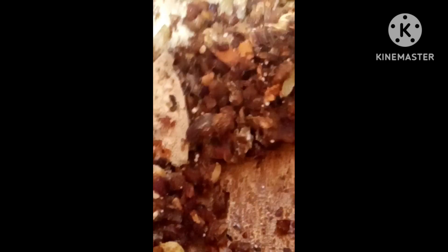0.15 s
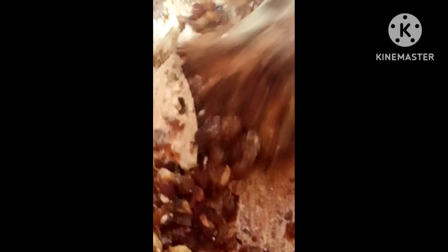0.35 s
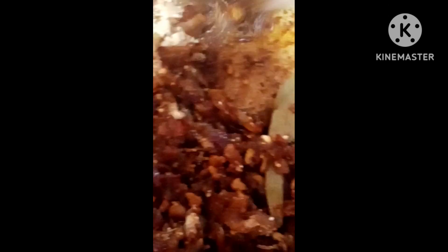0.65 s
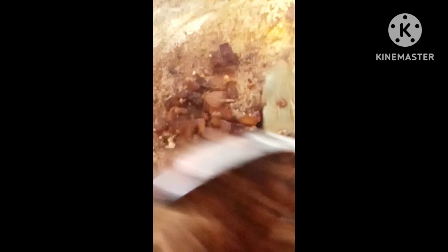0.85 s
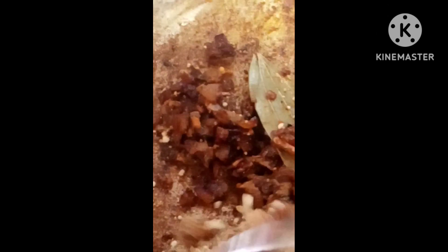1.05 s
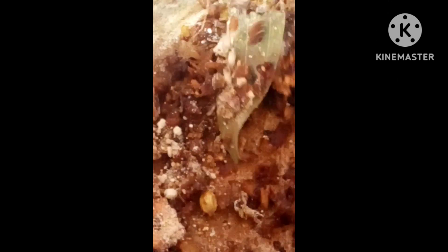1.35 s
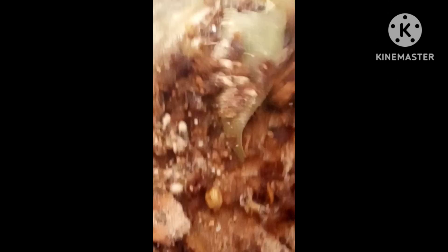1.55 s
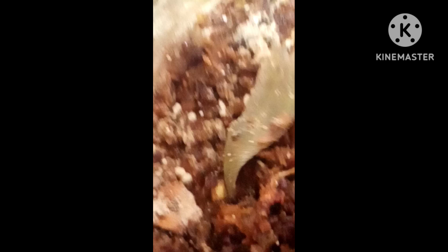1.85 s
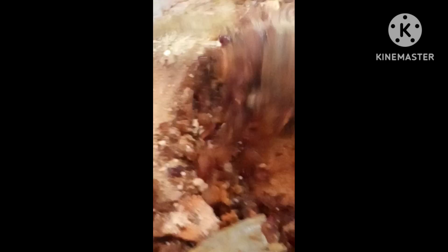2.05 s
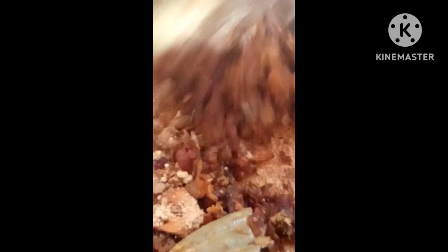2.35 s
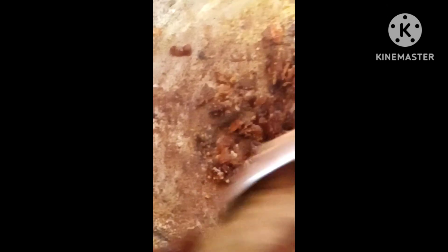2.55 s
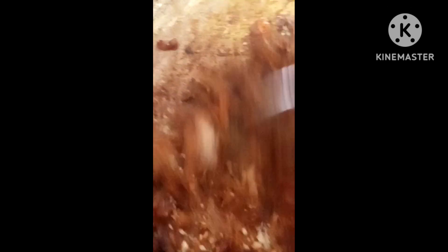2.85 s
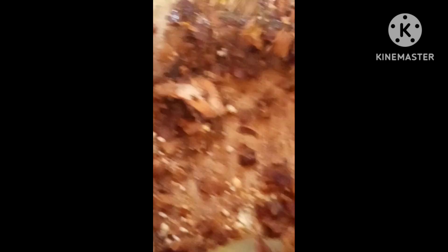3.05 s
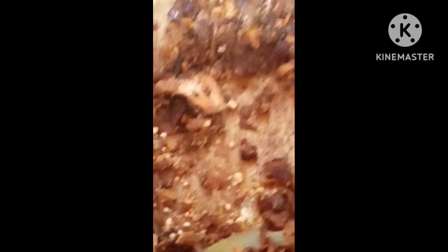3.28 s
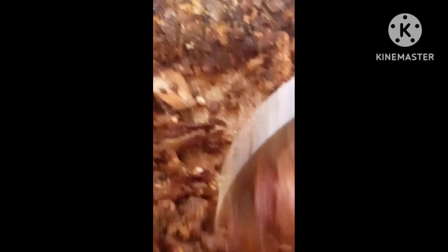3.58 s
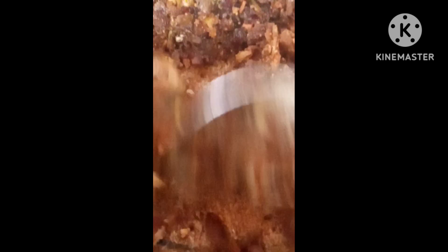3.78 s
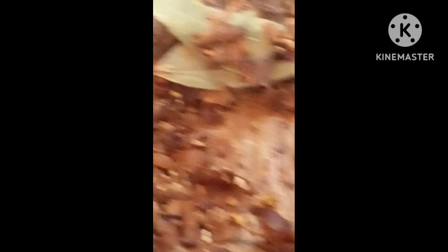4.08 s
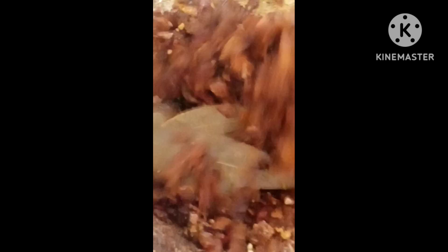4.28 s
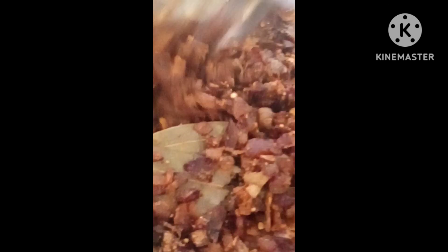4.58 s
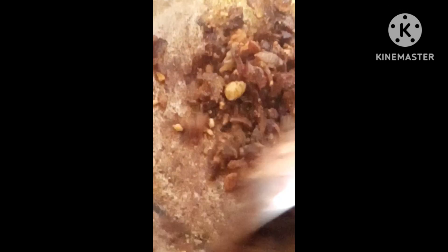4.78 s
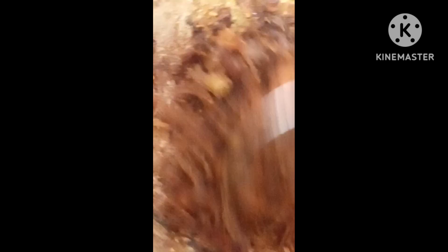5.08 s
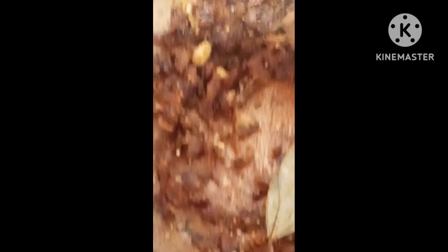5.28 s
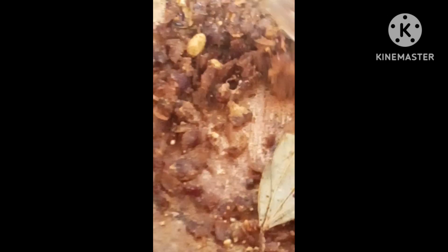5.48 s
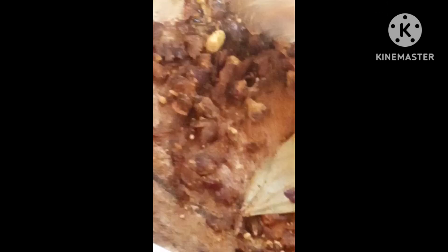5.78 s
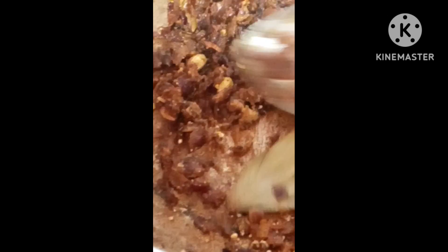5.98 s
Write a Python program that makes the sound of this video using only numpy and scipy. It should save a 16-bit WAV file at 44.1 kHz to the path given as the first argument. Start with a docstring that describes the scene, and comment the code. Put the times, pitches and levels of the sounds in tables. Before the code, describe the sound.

A metal spoon scrapes and clinks against a pan, shoving dry, crumbly fried spices around in short uneven strokes, close up in a small kitchen.

```python
"""Small kitchen: a steel spoon stirs dry fried spices in a metal pan, close to two unlike microphones.
Grinding and knocks: grain noise and single clicks excite the pan's damped modes; hiss and cracks are added.
Crumbs and drone: the shoved heap sets the level of clumped, filtered grains and of low resonant noise.
Hum: steady coloured noise with two low tones. Room: feedback delays answer the knocks."""
import sys
import numpy as np
from scipy import signal
from scipy.fft import rfft, irfft, next_fast_len
from scipy.io import wavfile

SR = 44100
rng = np.random.default_rng(int(sys.argv[2]) if len(sys.argv) > 2 else 0)


def to_wav(s):
    """Save 16-bit WAV."""
    ch = np.atleast_2d(s).T  # columns
    pcm = np.round(np.clip(ch, -1, 1) * 32767)  # PCM
    wavfile.write(sys.argv[1], SR, pcm.astype(np.int16))


N = 270494

# All table levels are relative: layer offsets, OUTPUT_GAIN_DB and the microphone filters follow.
# Spoon grinding strokes: crest_s, level_db, rise_s, fall_s, best_mode_hz
SCRAPE_STROKES = [(0.0, -47.5, 0.1, 0.3, 6735), (0.326, -46.5, 0.035, 0.18, 5800),
                  (0.529, -42.5, 0.16, 0.067, 4600), (0.635, -41, 0.023, 0.29, 6735),
                  (0.699, -41.5, 0.11, 0.32, 5800), (1.05, -56, 0.012, 0.3, 6735),
                  (1.248, -51, 0.28, 0.24, 2840), (1.535, -49.5, 0.056, 0.23, 6735),
                  (1.62, -46.5, 0.05, 0.074, 2980), (1.888, -53, 0.011, 0.4, 5800),
                  (2.06, -53.5, 0.23, 0.043, 3050), (2.37, -32.5, 0.1, 0.18, 3380),
                  (2.77, -45.5, 0.045, 0.35, 3050), (3.165, -50, 0.023, 0.15, 2650),
                  (3.354, -39.5, 0.19, 0.16, 2900), (3.74, -49, 0.064, 0.59, 7200),
                  (4.202, -32.5, 0.035, 0.084, 3400), (4.608, -30.5, 0.11, 0.11, 5335),
                  (4.74, -47, 0.15, 0.16, 6735), (5.02, -36.5, 0.0066, 0.15, 4670),
                  (5.2, -50.5, 0.23, 0.15, 2840), (5.428, -59.5, 0.044, 0.13, 2650),
                  (5.607, -50.5, 0.12, 0.11, 6735), (5.882, -56, 0.019, 0.038, 6735),
                  (6.0, -56, 0.12, 0.1, 3050)]
# Spoon shoving the heap: crest_s, rolling_db, rattling_db, drone_db, gather_s, settle_s
HEAP_SHOVES = [(0.0, -61, -53, -47, 0.1, 0.28), (0.18, -44.5, -47.5, -44, 0.22, 0.14),
               (0.35, -49, -54, -45, 0.2, 0.21), (0.688, -39.5, -50, -51, 0.1, 0.23),
               (1.299, -45, -44.5, -45, 0.18, 0.37), (2.085, -51.5, -48.5, -47, 0.2, 0.2),
               (2.305, -43, -49, -44.5, 0.21, 0.23), (2.975, -45, -45, -44.5, 0.15, 0.27),
               (3.2, -48, -59, -48, 0.17, 0.21), (3.39, -49, -61, -73, 0.15, 0.099),
               (3.732, -74, -72, -54, 0.049, 0.14), (3.93, -47.5, -41, -49, 0.029, 0.21),
               (4.007, -43.5, -44, -40, 0.043, 0.15), (4.215, -42.5, -40.5, -48.5, 0.15, 0.11),
               (4.536, -42, -54, -66, 0.076, 0.26), (4.67, -41.5, -50.5, -65, 0.1, 0.14),
               (5.05, -62, -40.5, -51, 0.049, 0.31), (5.24, -45.5, -43.5, -43.5, 0.086, 0.26)]
# Spoon blows on the pan: start_s, peak_db, best_mode_hz, thud_db (re peak), clink_db (re peak)
SPOON_KNOCKS = [(0.085, -17, 2820, -19, -21), (0.1418, -16, 2599, -22, -17), (0.173, -28.5, 2720, -10, -21),
                (0.2112, -28, 2580, -20, -21), (0.268, -27, 2790, -6, -25), (0.35, -25.5, 2476, -5.5, -16),
                (0.4099, -25, 2720, -14.5, -41), (1.153, -30, 2496, -11.5, -15),
                (1.2352, -18, 2840, -19, -21), (1.2922, -24, 2610, -16, -21), (1.321, -29, 2140, -16, -22),
                (1.3454, -17.5, 2850, -15, -20.5), (1.496, -32, 2840, -7, -31),
                (1.976, -35.5, 2415, -5, -18), (2.0516, -17, 2816, -14.5, -25),
                (2.1038, -21.5, 2387, -9.5, -20.5), (2.1999, -22, 2840, -11, -22.5),
                (2.2395, -26.5, 2730, -9, -13.5), (2.2845, -20.5, 2860, -25, -29),
                (2.9144, -17.5, 2840, -19, -19), (2.974, -19, 2607, -13, -12),
                (3.046, -24, 2680, -11.5, -14), (3.108, -30, 2830, -11, -32),
                (3.1569, -18.5, 2515, 3, -12.5), (3.2196, -22, 2590, -24, -18),
                (3.6963, -27, 885, 4, -10.5), (3.914, -15.5, 2853, -24, -19.5),
                (3.9854, -18.5, 2634, -17, -13), (4.119, -20.5, 1890, -2.5, -15.5),
                (4.1826, -17.5, 3420, -20, -21), (5.0105, -14.5, 4430, -7.5, -2.5),
                (5.1847, -16.5, 2820, -15.5, -21.5), (5.2437, -20.5, 2570, -13.5, -17),
                (5.3214, -31, 2370, -21, -15), (5.371, -33.5, 2720, -8, -27), (5.418, -25, 2510, -10, -15)]
# Pan and spoon mode pitches: mode_hz
MODE_HZ = [540, 760, 1000, 1200, 1920, 2160, 2455, 2650, 2840, 3050, 3380, 3760, 4245, 4670, 5335, 5800,
           6735, 7150, 8400]
# Food-damped modes, one row per MODE_HZ: knocked_db, ground_db, t60_s (when ground)
PAN_MODES = [(-7, -19.5, 0.028), (-10.5, -13.5, 0.016), (-1, -20, 0.04), (4.5, -26, 0.014),
             (-11.5, -42, 0.07), (-13, -29, 0.072), (2.5, -32, 0.025), (-0.5, -14, 0.042),
             (1.5, -12.5, 0.031), (-11, -8, 0.056), (-3.5, -1.5, 0.037), (-11, -11, 0.044),
             (2.5, 0.5, 0.02), (9.5, -3.5, 0.025), (-1.5, -2, 0.043), (0.5, -10.5, 0.044), (-5, -8, 0.071),
             (1.5, -30, 0.034), (-5, -11.5, 0.037)]
# Pan bottom resonances: centre_hz, width_hz, level_db
BOTTOM_MODES = [(207.8, 7.7, -4), (242.7, 20.5, -0.5), (314.2, 18, -1), (418, 35, -5.5)]
# Grit hiss spectrum: freq_hz, density_db (per Hz)
GRIT_SPECTRUM = [(1060, -55), (1800, -33), (2790, -8), (3350, -3.5), (3840, -14), (4660, -7.5), (6710, -2),
                 (11000, -21.5), (15000, -11), (16000, -4)]
# Tumbling crumb spectrum: freq_hz, density_db (per Hz)
CRUMB_SPECTRUM = [(250, -8), (400, -8.5), (900, -8), (1500, -9), (2700, -4), (4000, -15), (8000, -76)]
# Kitchen hum spectrum: freq_hz, density_db (per Hz)
HUM_SPECTRUM = [(24, -38), (40, -45), (115, 3.5), (615, -16), (896, -11.5), (1590, -13), (2980, -14),
                (3930, -14), (6650, -30), (11000, -86), (14800, -49), (16000, -15.5)]
# Narrow hum tones: centre_hz, width_hz, level_db
HUM_TONE_BANDS = [(97, 16.4, -63), (141.4, 4.7, -63)]
# Left microphone response re right: freq_hz, gain_db
LEFT_RESPONSE = [(100, -2.5), (400, -6.5), (750, 0.5), (1500, -6), (2800, -6), (9000, -1.5), (11000, -2.5),
                 (14000, -23.5)]

SWING_DB = 20  # gesture rises this much over its rise time, drops it over its fall time
SCRAPE_ROUND, SHOVE_ROUND = 1.48, 1.165  # exponent: 1 = pointed crest, 2 = bell
EDGE_REST_DB, HEAP_REST_DB = -70, -68  # between gestures
FAVOUR_DB, FAVOUR_WIDTH_LOG_HZ = 5, 0.073  # lift of modes near the best shaken one
GROUND_SPLIT_HZ = 2300  # heap shakes modes up to here, spoon edge those above
CRISP_FROM_HZ = 1720  # crumbs roll below, rattle above
HUM_DB = -62
PRESSED_T60_SHARE, DRIVE_T60_SHARE = 0.75, 0.27
KITCHEN_BASS_T60_S, WALL_CUT_HZ, KITCHEN_DB = 0.31, 8100, -21
LEFT_LEAD_SAMPLES, OUTPUT_GAIN_DB, CUTOFF_HZ = 46, 6.0, 16800


def from_db(db):
    """Decibels to gain."""
    return 10 ** (np.asarray(db) / 20)


def rms_one(x):
    """Scale to rms 1."""
    return x / np.sqrt(np.mean(x ** 2) + 1e-20)


def colour(x, points):
    """Filter with a (Hz, dB) curve, interpolated over log frequency."""
    size = next_fast_len(N)
    freq_hz = np.maximum(np.arange(size // 2 + 1) * SR / size, 1)
    point_hz, point_db = np.transpose(points)
    gain = from_db(np.interp(np.log(freq_hz), np.log(point_hz), point_db))
    return irfft(rfft(x, size) * gain, size)[..., :N]


def drift(rate_hz):
    """Slow random wander, rms 1: two-pole lowpassed noise at SR / 40."""
    r = np.exp(-80 * np.pi * rate_hz / SR)
    noise = rng.standard_normal(N // 40 + 2002)
    slow = signal.lfilter([1], [1, -2 * r, r * r], noise)[2000:]  # drop the run-in
    return np.interp(np.arange(N) / 40, np.arange(len(slow)), rms_one(slow))


def ring(clicks, hz, t60_s):
    """Two-pole resonator: a unit click starts a decaying sine of height 1."""
    r = np.exp(-np.log(1000) / (t60_s * SR))
    w = 2 * np.pi * hz / SR
    return signal.lfilter([0, np.sin(w)], [1, -2 * r * np.cos(w), r * r], clicks + 1e-18)


def hiss_in(hz, width_hz):
    """Noise through one resonance, rms 1."""
    t60_s = np.log(1000) / (np.pi * width_hz)
    return rms_one(ring(rng.standard_normal(N), hz, t60_s))


def grains(per_s, spread_db):
    """Random clicks of uneven size, rms 1."""
    size_db = spread_db * np.minimum(rng.exponential(1, N), 5)
    sizes = from_db(size_db) * rng.choice([-1, 1], N)
    return rms_one(sizes * (rng.random(N) < per_s / SR))


def two_ears(shared, own, alike):
    """Mix by power share: a part common to both microphones and one of each's own."""
    alike = np.clip(alike, 0, 1)
    return np.sqrt(alike) * shared + np.sqrt(1 - alike) * np.asarray(own)


def gestures(crest_s, peak_db, rise_s, fall_s, roundness, rest_db):
    """Level in dB of overlapping gestures: each swells and dies away; their powers add."""
    from_crest_s = np.arange(0, N + 64, 64) / SR - crest_s[:, None]
    away = np.where(from_crest_s < 0, -from_crest_s / rise_s[:, None], from_crest_s / fall_s[:, None])
    each_db = peak_db[:, None] - SWING_DB * away ** roundness
    power = from_db(2 * each_db).sum(axis=0) + from_db(2 * rest_db)
    return np.interp(np.arange(N) / 64, np.arange(len(power)), 10 * np.log10(power))


def scraping(hz=None):
    """Stroke strength in dB, overall or as the mode at hz feels it."""
    crest_s, level_db, rise_s, fall_s, best_hz = np.transpose(SCRAPE_STROKES)
    if hz:
        level_db = level_db + FAVOUR_DB * np.exp(-(np.log(hz / best_hz) / FAVOUR_WIDTH_LOG_HZ) ** 2)
    return gestures(crest_s, level_db, rise_s, fall_s, SCRAPE_ROUND, EDGE_REST_DB)


def grinding(rolling_db):
    """Grit under the spoon's edge shakes the high modes, the rolling heap the low ones, in fits."""
    fits_db = 2.0 * drift(23.6) + 40
    grit = two_ears(grains(1800, spread_db=2.5), rng.standard_normal((2, N)), 0.58)
    modes = 0
    for hz, (_, ground_db, t60_s) in zip(MODE_HZ, PAN_MODES):
        if hz > GROUND_SPLIT_HZ:
            push_db = 1.173 * (scraping(hz) + fits_db) - 36.5  # hard strokes reach the metal
        else:
            push_db = rolling_db + 11.0
        mode_db = ground_db + 5.2 * drift(17)
        modes = modes + ring(grit * from_db(push_db + mode_db), hz, t60_s) / np.sqrt(t60_s * SR)
    hiss = rms_one(colour([grains(3000, spread_db=3.0), grains(3000, spread_db=0.5)], GRIT_SPECTRUM))
    hiss_db = 0.91 * (scraping() + fits_db) - 42.5  # light strokes mostly hiss
    return modes + from_db(hiss_db) * hiss


def crumbs(rolling_db, rattling_db):
    """Crumbs tumble in clumps: dull rolling below the split, crisp rattling above."""
    tumble = two_ears(grains(1500, spread_db=5.5), rng.standard_normal((2, N)), 0.28)
    clumps_db = 2.2 * drift(25)
    tumble = from_db(clumps_db - 3.0) * rms_one(colour(tumble, CRUMB_SPECTRUM))
    dull = signal.sosfilt(signal.butter(4, CRISP_FROM_HZ, "low", fs=SR, output="sos"), tumble)
    crisp = signal.sosfilt(signal.butter(4, CRISP_FROM_HZ, "high", fs=SR, output="sos"), tumble)
    return from_db(rolling_db) * dull + from_db(rattling_db) * crisp


def bottom(drone_db):
    """The pushed load keeps the pan's lowest modes droning: noise through resonances."""
    drone = sum(from_db(db) * hiss_in(hz, width_hz) for hz, width_hz, db in BOTTOM_MODES)
    return from_db(drone_db) * rms_one(drone)


def hum():
    """Steady kitchen noise, alike on both sides only in the bass, plus narrow tones."""
    white = rng.standard_normal((3, N))
    bass = signal.butter(2, 500, fs=SR, output="sos")
    air = white[1:] + signal.sosfilt(bass, white[0] - white[1:])  # swap in the common bass
    tones = sum(from_db(db) * hiss_in(hz, width_hz) for hz, width_hz, db in HUM_TONE_BANDS)
    return from_db(HUM_DB) * rms_one(colour(air, HUM_SPECTRUM)) + tones


def knocks():
    """Blows favour modes near their own; thud scales low modes, clink high ones; a crack marks touch."""
    start_s, peak_db, best_hz, thud_db, clink_db = np.transpose(SPOON_KNOCKS)
    at = (start_s * SR).astype(int)
    ringing = np.zeros((2, N))
    luck_db = 2.5 * rng.standard_normal((len(at), len(PAN_MODES)))
    for k, (hz, (struck_db, _, t60_s)) in enumerate(zip(MODE_HZ, PAN_MODES)):
        # best struck mode and its partners at set ratios above
        family = [np.exp(-(np.log(hz / best_hz / ratio) / .03) ** 2) for ratio in (1, 1.28, 1.645, 2.01)]
        near_db = 10 * sum(family)
        region_db = thud_db if hz < 1500 else clink_db if hz > 4000 else 0
        clicks = np.zeros(N)
        clicks[at] = from_db(peak_db + struck_db + near_db + region_db - 10.5 + luck_db[:, k])
        pressed_t60_s = PRESSED_T60_SHARE * t60_s  # the resting spoon damps the metal
        spoon = ring(clicks, hz, DRIVE_T60_SHARE * pressed_t60_s)
        swelling = ring(spoon, hz, pressed_t60_s)  # spoon drives pan: swells, then dies
        gain = 9 * np.log(1000) / (pressed_t60_s * SR)
        ringing += swelling * gain * rng.choice([-1, 1], (2, 1))
    blows = np.zeros(N)
    blows[at] = from_db(peak_db + 1.25 * clink_db + 0.43 * thud_db)
    fade = np.exp(-np.log(1000) / (0.055 * SR))  # crack t60 0.055 s
    crack = signal.lfilter([1], [1, -fade], blows) * rng.standard_normal((2, N))
    crack = signal.sosfilt(signal.butter(1, [900, 7000], "band", fs=SR, output="sos"), crack)
    return ringing + from_db(-1.5) * crack


def kitchen(x):
    """Room echoes: twelve feedback delays a side, duller on every round."""
    size = next_fast_len(N + SR // 2)
    turn = -2j * np.pi * np.arange(size // 2 + 1) / size  # phase of a one-sample delay
    dull = 1 / (1 - turn * SR / (2 * np.pi * WALL_CUT_HZ))
    echoes = np.zeros((2, len(turn)), complex)
    for k, lag in enumerate(rng.uniform(.003, 0.02, size=24) * SR):
        loss = np.exp(-np.log(1000) * lag / SR / KITCHEN_BASS_T60_S)
        loop = loss * dull * np.exp(turn * int(lag))
        echoes[k % 2] += loop / (1 - loop) * (-1) ** (k // 2)
    return irfft(rfft(x, size) * echoes, size)[:, :N]


def scene():
    """All layers at the two microphones; sound reaches the left one first."""
    crest_s, *levels_db, gather_s, settle_s = np.transpose(HEAP_SHOVES)
    rolling_db, rattling_db, drone_db = (
        gestures(crest_s, db, gather_s, settle_s, SHOVE_ROUND, HEAP_REST_DB) for db in levels_db)
    blows = knocks()
    both = blows + from_db(KITCHEN_DB) * kitchen(blows)
    both = both + grinding(rolling_db) + crumbs(rolling_db, rattling_db)
    both = both + bottom(drone_db) + hum()
    return from_db(OUTPUT_GAIN_DB) * np.array([np.roll(both[0], -LEFT_LEAD_SAMPLES), both[1]])


def record(dry):
    """Left microphone has its own response; deepest bass and top are cut on both."""
    wet = np.array([colour(dry[0], LEFT_RESPONSE), dry[1]])
    wet = signal.sosfilt(signal.butter(4, 62, "high", fs=SR, output="sos"), wet)
    wet = signal.sosfilt(signal.cheby2(8, 28, 15900, fs=SR, output="sos"), wet)
    return signal.sosfilt(signal.cheby2(12, 70, CUTOFF_HZ, fs=SR, output="sos"), wet)


dry = scene()
out = record(dry)
to_wav(out)
```